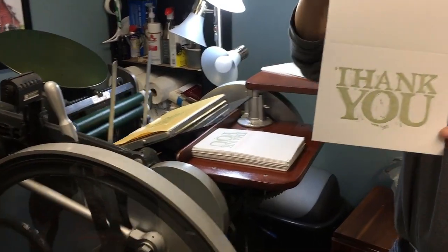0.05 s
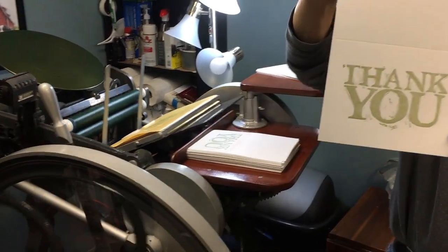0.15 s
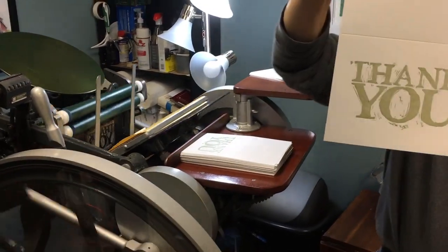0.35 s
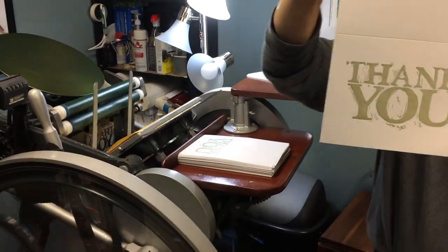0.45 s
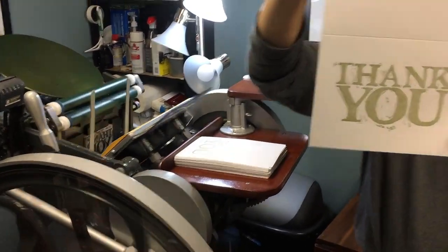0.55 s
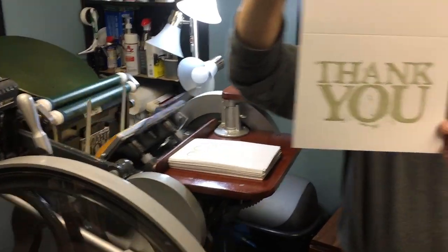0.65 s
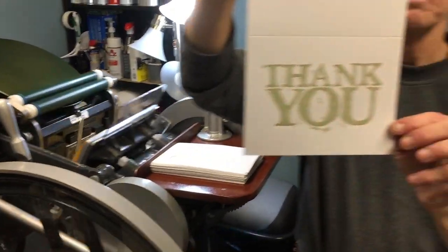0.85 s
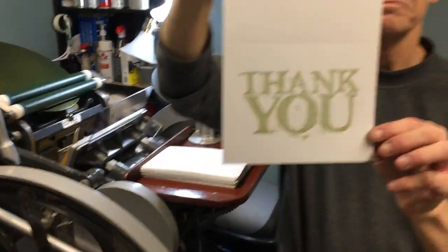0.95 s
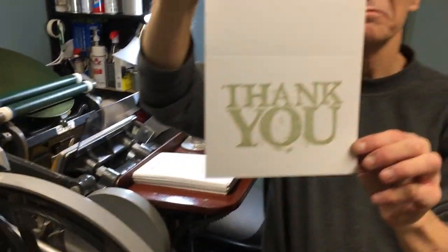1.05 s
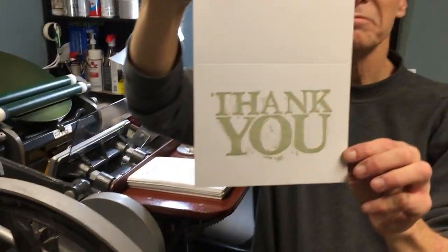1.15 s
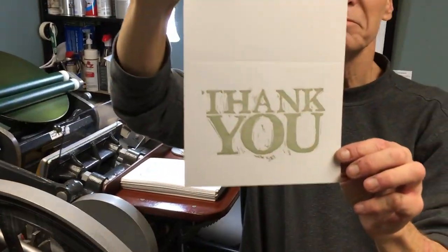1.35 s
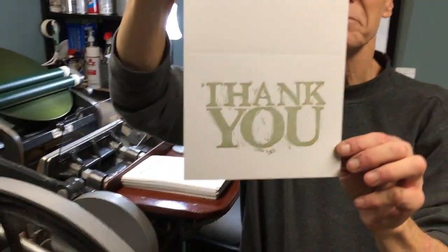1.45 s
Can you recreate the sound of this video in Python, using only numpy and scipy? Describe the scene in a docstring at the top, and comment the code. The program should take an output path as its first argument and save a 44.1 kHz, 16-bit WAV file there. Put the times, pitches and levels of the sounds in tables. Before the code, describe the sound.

Heard close in a small workshop, a printing press gives one bright, ringing metal clang. Quieter knocks and thuds follow as the rollers rumble and sticky ink hisses faintly over a low hum.

```python
"""One stroke of a platen printing press, heard close up in a small workshop.
From the start the drive hums, paper rustles and ticks, and the rollers rumble on their rails.
At 0.22 s a steel part, probably the pawl of the ink disc, strikes once and rings like a bell in
its normal modes. Thuds of the platen and knocks of the linkage follow. From about 0.8 s the
tacky ink sizzles louder and the rollers swell; a last thud falls just before the end at 1.5 s."""
import sys
import numpy as np
from scipy import signal
from scipy.fft import rfft, irfft
from scipy.io import wavfile

SR = 44100
rng = np.random.default_rng(int(sys.argv[2]) if len(sys.argv) > 2 else 0)


def output_pcm(signal):
    """Save a mono or channel-first signal as 16-bit PCM at the path in sys.argv[1].

    Samples are clipped to [-1, 1] before scaling.
    """
    pcm = np.clip(np.atleast_2d(signal).T, -1, 1) * 32767
    wavfile.write(sys.argv[1], SR, np.round(pcm).astype(np.int16))


N = 66150
TOP_HZ = 15800


def undb(db):
    """Decibels to amplitude ratio."""
    return 10 ** (np.asarray(db) / 20)

def unit(x):
    """Normalisation to rms 1."""
    return x / np.sqrt(np.mean(np.abs(x) ** 2))

def clock():
    """Time of every sample in seconds."""
    return np.arange(N) / SR

def level_curve(points):
    """Amplitude envelope interpolated through (seconds, dB) points."""
    times, db = np.array(points).T
    return undb(np.interp(clock(), times, db))

def shaped(gain_at):
    """Spectral shaping: noise of rms 1 whose gain is a function of frequency."""
    hz = np.maximum(np.fft.rfftfreq(N, 1 / SR), 1)
    return unit(irfft(rfft(rng.standard_normal(N)) * gain_at(hz), N))

def coloured(points):
    """Noise with a spectrum interpolated through (Hz, dB) points."""
    hz, db = np.array(points).T
    return shaped(lambda f: undb(np.interp(np.log(f), np.log(hz), db)))

def resonant(hz, width_hz, edge_hz):
    """Broad resonance driven by noise, falling steeply above an edge."""
    detuning = lambda f: (f * f - hz * hz) / (f * width_hz)
    return shaped(lambda f: 1 / np.sqrt((1 + detuning(f) ** 2) * (1 + (f / edge_hz) ** 8)))

def blow(start, rise, t60):
    """Damped response to a blow: a linear rise, then a fall of 60 dB in t60 seconds."""
    age = clock() - start
    return np.clip(age / rise, 0, 1) * np.exp(-np.log(1000) * np.maximum(age - rise, 0) / t60)

def beating(hz, scatter, width_hz, envelope):
    """Interference: a tone wavers in level and phase as reflections mix with it."""
    skirt = lambda f: 1 / np.sqrt((1 + (f / width_hz) ** 2) * (1 + (f / width_hz / 10) ** 2))
    beat = 1 + scatter * (shaped(skirt) + 1j * shaped(skirt))
    beat = beat / np.sqrt(np.average(np.abs(beat) ** 2, weights=envelope ** 2))
    return envelope * np.imag(beat * np.exp(2j * np.pi * (hz * clock() + rng.random())))

def rubbing(levels, spectrum, grain_db, grain_hz):
    """Contact noise: random amplitude modulation breaks it into uneven grains."""
    noise = coloured(spectrum)
    grains = shaped(lambda f: np.exp(-(f / grain_hz) ** 2 / 2))
    return level_curve(levels) * unit(noise * undb(grain_db * grains))


# Hum of the drive. Each row: time in seconds, level in dB.
HUM_LEVELS = [(0, -66), (.9, -65.5), (1.05, -63.5), (1.5, -59)]

def drive_hum():
    """Periodic vibration: the loaded drive gives one low, wavering tone."""
    return np.sqrt(2) * beating(hz=53.7, scatter=.58, width_hz=3.5, envelope=level_curve(HUM_LEVELS))


# Air of the workshop. Each row: frequency in Hz, relative spectral density in dB.
AIR_SPECTRUM = [(25, -21), (48, 0), (75, -6.5), (100, 5), (140, -5.5), (220, -2.5), (330, -4), (500, -19),
                (1000, -26.5), (2500, -39), (6000, -23), (8000, -32.5), (15000, -31.5)]

def room_air():
    """Stationary noise: the room's background, strongest in the bass."""
    return undb(-64.5) * coloured(AIR_SPECTRUM)


# Course of the rumble. Each row: time in seconds, level in dB.
ROLLER_LEVELS = [(0, -56.5), (.15, -70.5), (.4, -74), (.54, -64), (.61, -71.5), (.72, -61.5), (.83, -75.5),
                 (.95, -54), (.985, -53.5), (1.045, -46.5), (1.08, -55), (1.16, -61), (1.3, -85),
                 (1.5, -55.5)]
# Its colour. Each row: frequency in Hz, relative spectral density in dB.
ROLLER_SPECTRUM = [(40, -10.5), (95, 8), (130, -7.5), (240, 2), (400, -2.5), (700, -6.5), (1050, -6.5),
                   (1400, -23), (2400, -20), (5000, -38.5), (9000, -29.5)]

def rollers():
    """Rolling contact: the rollers rumble along their rails in coarse grains."""
    return rubbing(ROLLER_LEVELS, ROLLER_SPECTRUM, grain_db=-.5, grain_hz=40)


# Course of the sizzle. Each row: time in seconds, level in dB.
INK_LEVELS = [(0, -67), (.6, -73.5), (.72, -65), (.79, -54), (.95, -52.5), (1.1, -50.5), (1.35, -51.5),
              (1.5, -57)]
# Its colour. Each row: frequency in Hz, relative spectral density in dB.
INK_SPECTRUM = [(1500, -10), (4000, -18.5), (8000, -8), (10500, -4.5), (13000, 1.5), (15000, -3),
                (16000, 8.5)]

def ink():
    """Adhesion: tacky ink parts with a fine, high sizzle."""
    return rubbing(INK_LEVELS, INK_SPECTRUM, grain_db=1.5, grain_hz=900)


# Course of the rustle. Each row: time in seconds, level in dB.
PAPER_LEVELS = [(0, -62), (.045, -54.5), (.09, -62.5), (.17, -65), (.4, -64), (.52, -68), (.58, -75.5),
                (.92, -69), (.965, -57), (1.06, -64.5), (1.13, -69), (1.25, -68.5), (1.33, -82),
                (1.5, -69.5)]
# Its colour. Each row: frequency in Hz, relative spectral density in dB.
PAPER_SPECTRUM = [(300, 4), (1000, 8), (3000, 7), (5500, 5), (7800, -8), (9600, -5), (15000, -29.5)]

def paper():
    """Sliding friction: paper rustles over a broad band."""
    return rubbing(PAPER_LEVELS, PAPER_SPECTRUM, grain_db=2, grain_hz=152)


# Ticks of paper and ink. Each row: start in seconds, level in dB, t60 in seconds, centre in Hz.
TICK_EVENTS = [(0.027, -57, 0.01, 4460), (0.0707, -54, 0.018, 4000), (0.118, -64, 0.038, 5000),
               (.51, -67.5, 0.13, 8800), (.683, -63, 0.076, 6340), (.774, -60, .06, 11000),
               (0.937, -48.5, 0.099, 6100), (1.464, -56.5, 0.24, 12030), (1.465, -61.5, 0.18, 4470)]

def ticks():
    """Brief transients have wide spectra: bright flicks of paper and parting ink."""
    return sum(undb(db) * blow(start, .00033, t60) * resonant(hz, width_hz=hz, edge_hz=TOP_HZ)
               for start, db, t60, hz in TICK_EVENTS)


STRIKE_S = .2219
# Modes of the struck steel. Each row: frequency in Hz, relative level in dB, t60 in seconds.
STEEL_MODES = [(580, -31, .2), (990, -31, .2), (1686, -21, .25), (2182, -17, .28), (2642, -18, .29),
               (2682, -17, .27), (2722, -16, .25), (2770, -9.5, .3), (3394, 0, .24), (4020, -19, .23),
               (4113, -14.5, .28), (4826, -24, .28), (5000, -13, .26), (6052, -15, .26), (6118, -15, .27),
               (7312, -13, .22), (8440, -16.5, .25), (11040, -21.5, .22), (12600, -25, .22),
               (14900, -38, .2)]

def steel_ring():
    """Free vibration: the steel's normal modes decay, beating with their reflections."""
    rise_s, build_up_s, early_s = .0045, .008, .02
    age = np.maximum(clock() - STRIKE_S, 0)
    reflected = .45 * np.minimum(age / build_up_s, 1)
    early_boost = undb(3.5 * np.exp(-(age / early_s) ** 4))  # the first reflections add level
    late_ring = undb(-21) * blow(STRIKE_S, rise_s, t60=.62)
    ring = 0
    for hz, db, t60 in STEEL_MODES:
        lingering = late_ring / (1 + (hz / 4000) ** 2)  # mainly the lower modes
        envelope = np.hypot(early_boost * blow(STRIKE_S, rise_s, t60), lingering)
        scatter = reflected * np.sqrt(hz / 4000)
        ring = ring + undb(db) * beating(hz, scatter, width_hz=.0042 * hz, envelope=envelope)
    return undb(-17.6) * ring


# Ring of the press frame. Each row: frequency in Hz, relative spectral density in dB.
FRAME_SPECTRUM = [(200, -18), (550, -11), (1000, -6.5), (1450, -7.5), (1700, 3.5), (2100, -3.5), (2700, -2),
                  (3700, 2.5), (4250, -4), (4600, -10.5), (5600, 0), (6900, -9), (7900, -23.5),
                  (10200, -17), (11700, -26.5), (13200, -30), (15000, -33.5)]

def frame_ring():
    """Modal overlap: the frame's dense modes merge into noise whose treble dies sooner."""
    modes = coloured(FRAME_SPECTRUM)
    low = signal.sosfiltfilt(signal.butter(2, 4500, fs=SR, output="sos"), modes)
    low_ring = low * blow(STRIKE_S, rise=.0012, t60=.32)
    treble_ring = (modes - low) * blow(STRIKE_S, rise=.0017, t60=.28)
    return undb(-28.5) * (low_ring + treble_ring)


# Crack of the strike. Each row: frequency in Hz, relative spectral density in dB.
CRACK_SPECTRUM = [(250, -23.5), (550, -3), (1500, -2.5), (3500, -14.5), (6000, 7), (8500, -13),
                  (10000, -7.5), (12500, -8), (14300, -10.5), (16000, -19)]

def contact_crack():
    """Impact noise: the brief contact radiates a broadband burst."""
    return undb(-24.5) * coloured(CRACK_SPECTRUM) * blow(STRIKE_S, rise=.0031, t60=.028)


# Thuds of the platen and frame.
# Each row: start in seconds, level in dB, rise in seconds, pitch in Hz, t60 in seconds.
THUD_EVENTS = [(.245, -47, 0.04, 226.3, 0.29), (.245, -45, 0.014, 313, 0.24),
               (0.653, -55.5, 0.039, 191.4, 0.29), (0.934, -46, 0.0018, 250.8, 0.42),
               (1.1, -49.5, 0.0215, 230, 0.79), (1.372, -56.5, 0.0097, 212, 0.21),
               (1.464, -39.5, 0.0031, 335, 0.24), (1.461, -46, 0.0017, 203, 0.25)]

def thuds():
    """Soft impacts excite low frequencies: each rings one mode over a dull rumble."""
    out = 0
    for start, db, rise, hz, t60 in THUD_EVENTS:
        mode = np.sin(2 * np.pi * hz * (clock() - start))
        rumble = .41 * resonant(hz, width_hz=130, edge_hz=900)
        out = out + undb(db) * blow(start, rise, t60) * (mode + rumble)
    return out


# Knocks of the linkage. Each row: start in seconds, level in dB, rise in seconds,
# t60 in seconds, centre in Hz, width in Hz, upper edge in Hz.
LINKAGE_KNOCKS = [(0.461, -63, 0.0035, 0.077, 760, 600, 1200), (0.551, -62.5, .008, 0.22, 800, 1164, 1780),
                  (0.637, -58, 0.016, 0.28, 600, 1200, 1530), (0.679, -45, 0.0025, 0.31, 1030, 2220, 3240),
                  (0.854, -53, 0.0029, 0.24, 1000, 1600, 1740), (0.933, -50.5, 0.0017, 0.17, 590, 580, 930),
                  (0.997, -51, .003, 0.14, 800, 1410, 3070), (1.036, -49, 0.0021, 0.31, 590, 910, 1410),
                  (1.232, -63, 0.0046, 0.32, 1780, 1400, 4000), (1.372, -54.5, 0.013, 0.2, 444, 450, 1052),
                  (1.459, -60, 0.0021, 0.5, 794, 918, 1600)]
# Hollow rings of the iron. Each row: start in seconds, level in dB, pitch in Hz, t60 in seconds.
IRON_MODES = [(.681, -48, 1030, .12), (.681, -47, 1580, .12), (.681, -46, 1790, .12),
              (.681, -48, 2140, .16), (.681, -51, 3010, .1), (.853, -43, 517, .12), (.853, -50, 404, .14),
              (.856, -48, 964, .2), (.86, -50, 1060, .12), (1.233, -59, 1750, .2)]

def linkage():
    """Damping broadens resonance: heavy iron parts knock dully, and a few ring briefly."""
    knocks = sum(undb(db) * blow(start, rise, t60) * resonant(hz, width, edge)
                 for start, db, rise, t60, hz, width, edge in LINKAGE_KNOCKS)
    rings = sum(undb(db) * beating(hz, scatter=.85, width_hz=25, envelope=blow(start, .003, t60))
                for start, db, hz, t60 in IRON_MODES)
    return knocks + rings


def scene():
    """Superposition: the sounds of one stroke add in a single channel."""
    contact_noise = rollers() + ink() + paper()
    clang = steel_ring() + frame_ring() + contact_crack()
    return (contact_noise + clang + linkage() + thuds() + ticks() + drive_hum() + room_air())[None]

def record(dry):
    """Band limiting: the microphone drops the deepest bass and cuts the top."""
    dry = signal.sosfilt(signal.butter(4, 36, "high", fs=SR, output="sos"), dry)
    return signal.sosfilt(signal.ellip(10, .2, 80, TOP_HZ, fs=SR, output="sos"), dry)


dry = scene()
out = record(dry)
output_pcm(out)
```